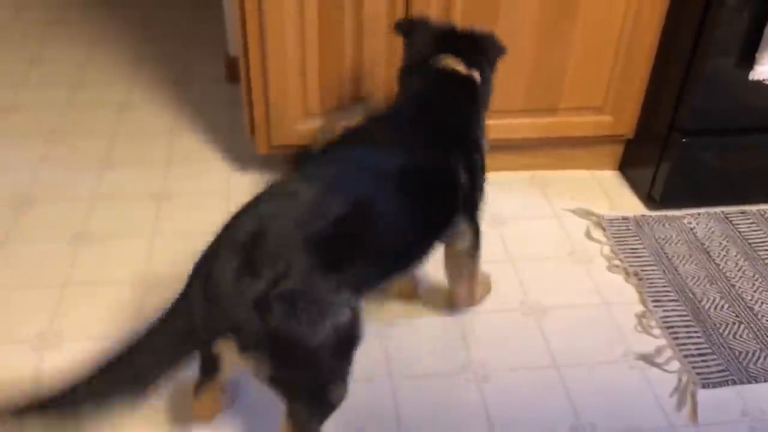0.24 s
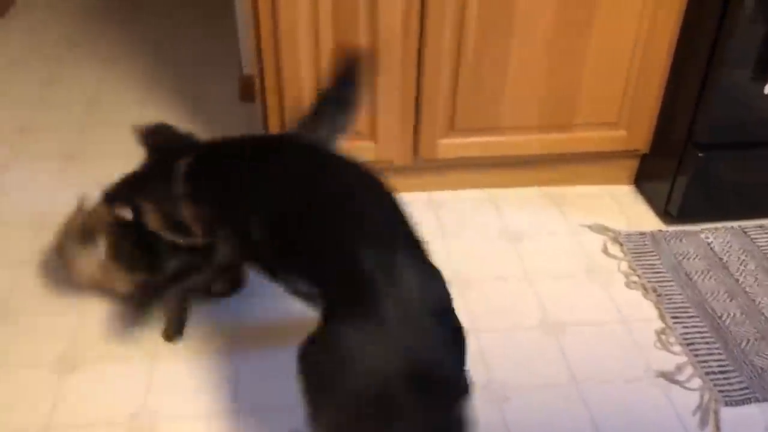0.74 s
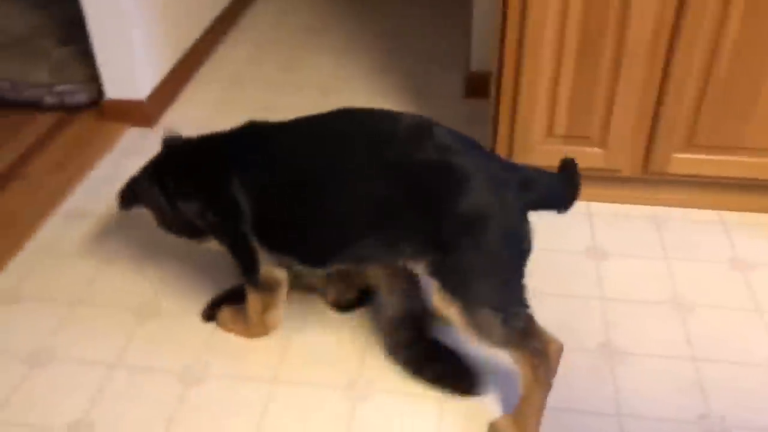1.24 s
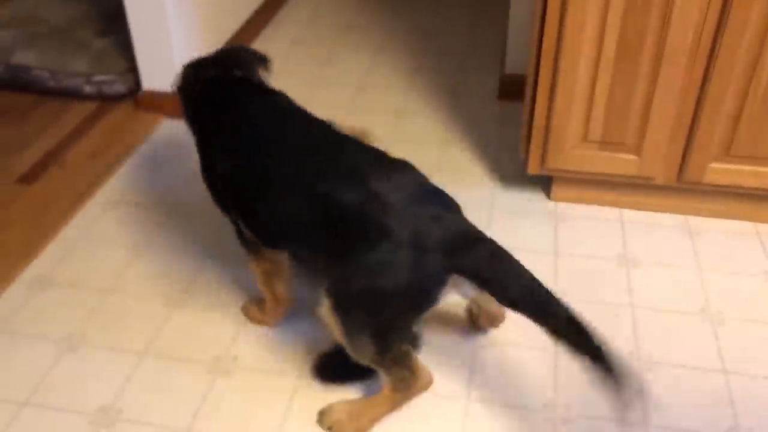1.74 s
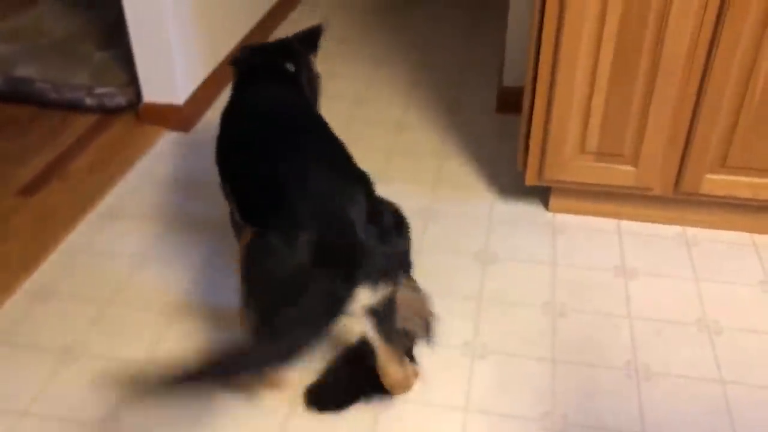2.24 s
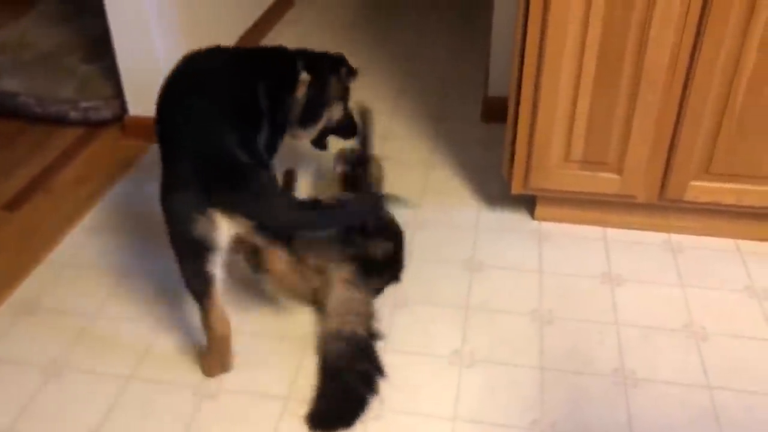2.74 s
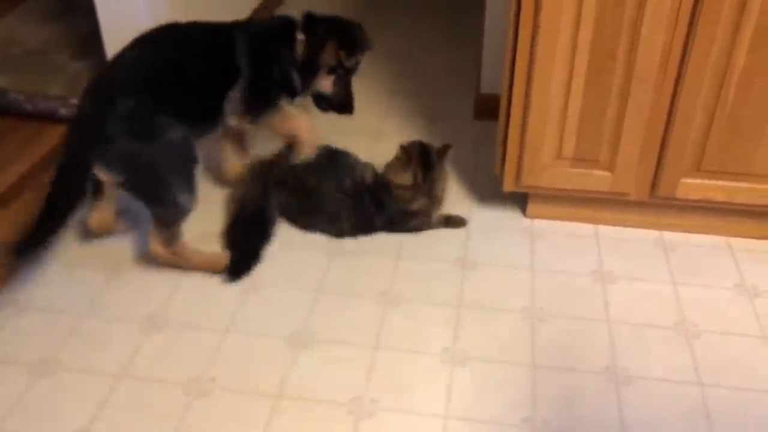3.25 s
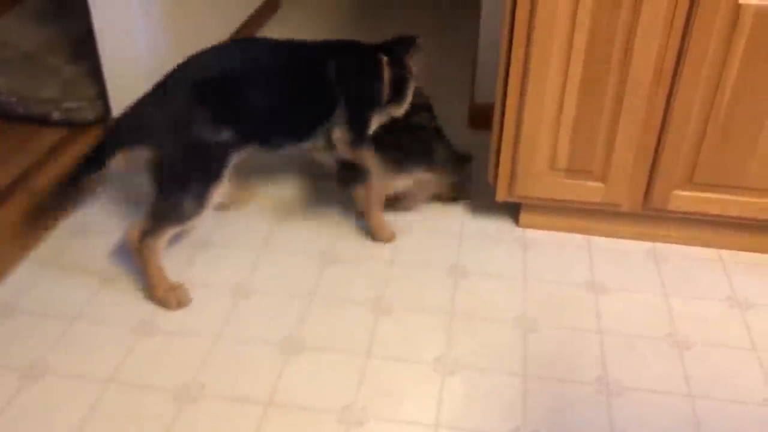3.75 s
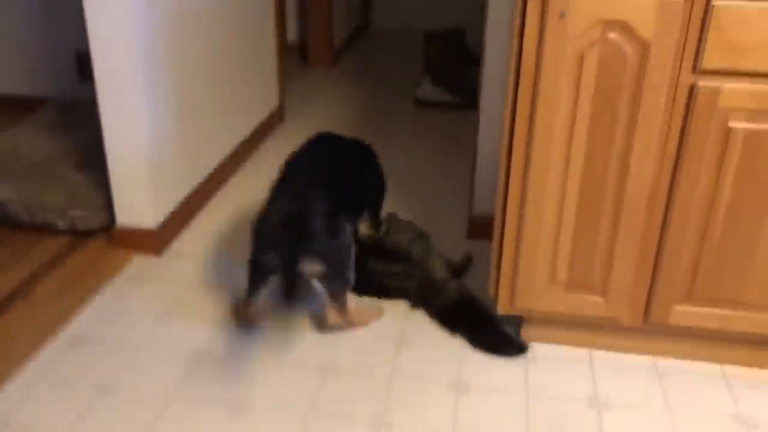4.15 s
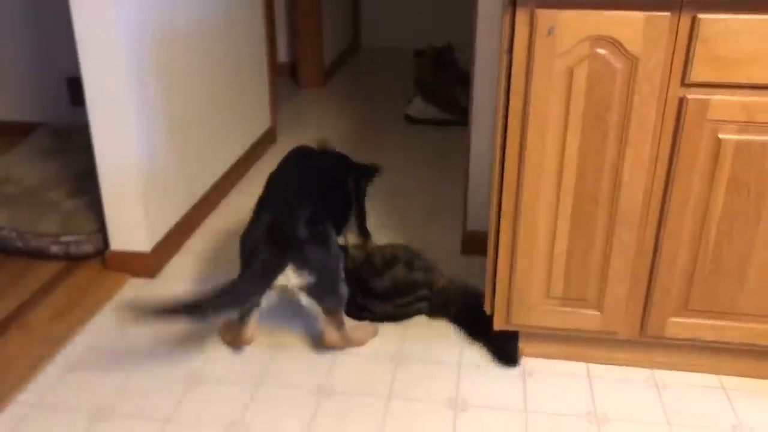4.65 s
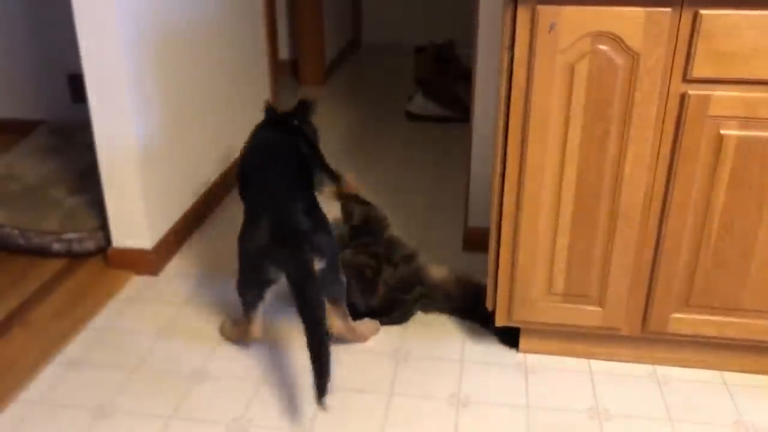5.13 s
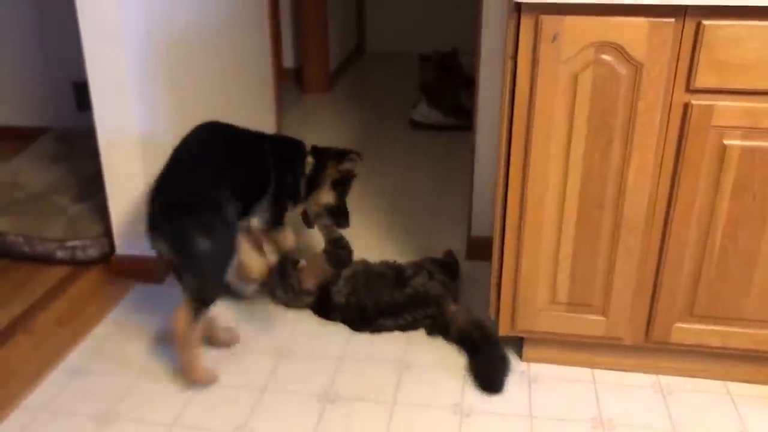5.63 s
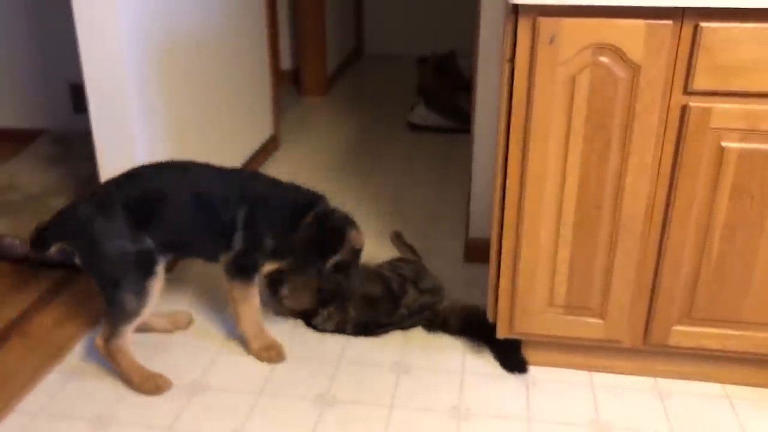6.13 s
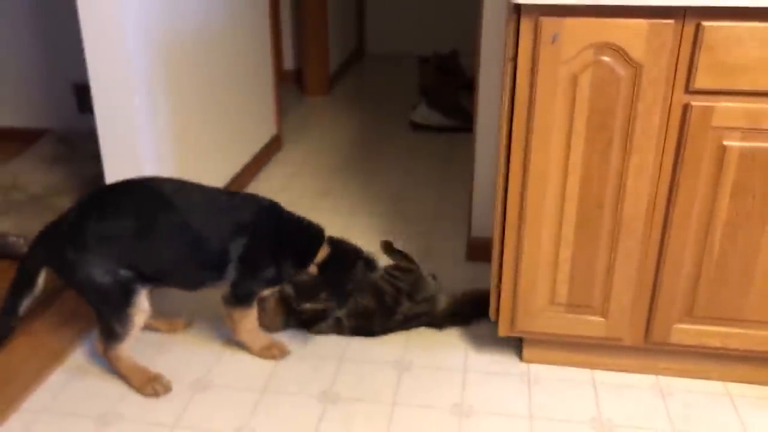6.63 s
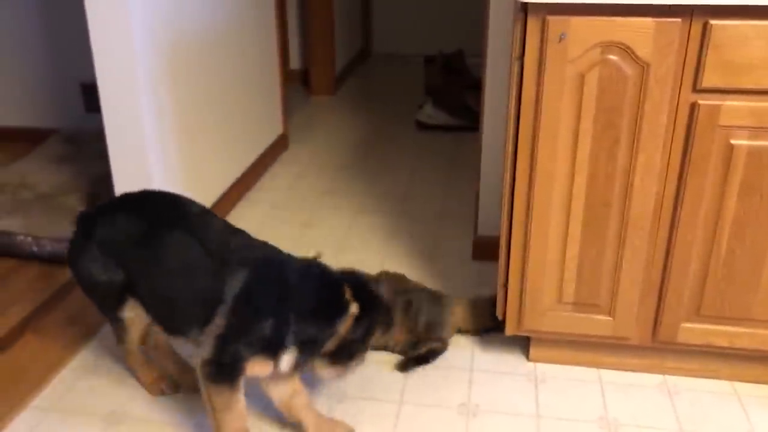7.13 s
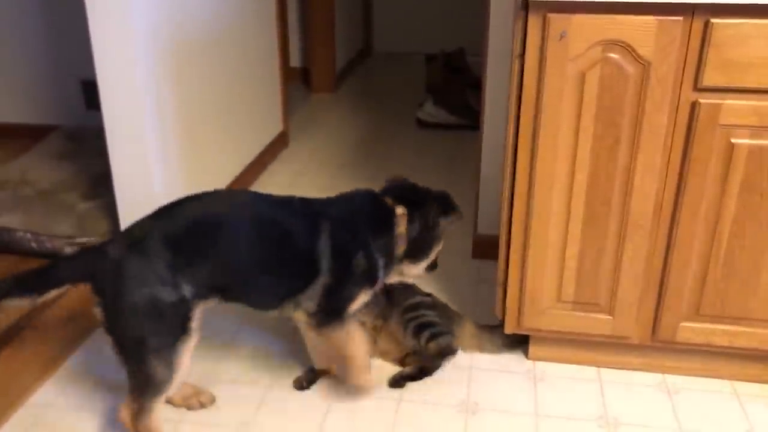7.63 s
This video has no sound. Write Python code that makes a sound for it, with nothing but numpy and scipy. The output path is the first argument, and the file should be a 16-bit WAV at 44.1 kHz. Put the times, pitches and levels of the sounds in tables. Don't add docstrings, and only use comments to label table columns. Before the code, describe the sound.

A puppy and cat tumble on a vinyl-tiled kitchen floor. Low body thuds, pad slaps and bright claw skids crowd the first second, peaking in one hard slam. It eases into soft fur rustle and a tiny sniff, then a second burst of thumps and sharp ticks. After a lull come scattered steps, nose snuffles and a last lighter scrap. A refrigerator hums faintly; a handheld phone microphone catches short, bright room reflections.

```python
import sys
import numpy as np
from scipy import signal
from scipy.fft import rfft, irfft, next_fast_len
from scipy.io import wavfile
from scipy.ndimage import map_coordinates

SR = 44100
rng = np.random.default_rng(int(sys.argv[2]) if len(sys.argv) > 2 else 0)


def volts_from_decibels(level):
    exponent = np.asarray(level, float) / 20
    return 10 ** exponent


def output_pcm(signal):
    pcm = np.clip(np.atleast_2d(signal).T, -1, 1) * 32767
    wavfile.write(sys.argv[1], SR, np.round(pcm).astype(np.int16))


N = 347508
T = np.arange(N) / SR


def unit(x):
    return x / np.sqrt(np.mean(x ** 2) + 1e-20)


def along(points, hz):
    f, v = np.transpose(points)
    return np.interp(np.log(hz + 1), np.log(f + 1), v)


def filtered(x, response):
    m = next_fast_len(len(x) + 4096)
    return irfft(rfft(x, m) * response(np.fft.rfftfreq(m, 1 / SR)), m)[:len(x)]


def peak(f, hz, width_hz):
    return 1j * f * width_hz / (hz * hz - f * f + 1j * f * width_hz)


def wobble(rate_hz):
    knots = rng.standard_normal(int(N * rate_hz / SR) + 4)
    return map_coordinates(knots, [T * rate_hz])


def add(track, start_s, sound):
    track[round(start_s * SR):][:len(sound)] += sound


def thuds():
    # (time [s], peak [dB], floor note [Hz], pad [dB])
    pounces = [(0.302, -27, 168, -13), (0.445, -36.5, 290, -15), (0.606, -29.5, 157, -7.5),
               (0.772, -27.5, 254, -13.5), (1.742, -31, 147, -14), (2.224, -38.5, 290, -10),
               (2.471, -52, 162, -5.5), (2.827, -34, 205, -10.5), (3.111, -41, 153, -15),
               (3.825, -27.5, 203, -9.5), (4.186, -39.5, 200, -7.5), (6.334, -44, 150, -17),
               (7.08, -36.5, 153, -22), (7.313, -56, 280, 6.5), (7.496, -36.5, 261, -7.5),
               (7.514, -37.5, 156, -11.5), (7.82, -36, 246, -9)]
    # (time [s], peak [dB], floor note [Hz], pad [dB])
    steps = [(0.176, -35, 217, -24), (2.05, -44.5, 191, -12), (2.92, -35.5, 198, -12),
             (3.219, -34.5, 242, -13), (3.493, -28.5, 227, -7), (3.663, -31.5, 252, -7.5),
             (3.717, -31.5, 293, -15), (3.798, -33.5, 199, -4.5), (3.868, -30.5, 142, -12),
             (4.443, -52, 169, 1), (5.716, -40, 134, -22), (6.076, -30.5, 181, -7.5)]
    # (time [s], peak [dB], floor note [Hz], pad [dB])
    blows = [
        (0.908, -24, 231, 1.5),
        (0.916, -12.5, 205, -22),
        (1.049, -24.5, 202, -8.5),
        (3.511, -24, 143, -18),
        (4.044, -40, 179, -2.5),
        (5.452, -51.5, 245, -3),
        (5.587, -28, 202, -5),
        (5.793, -39, 206, -32),
    ]
    # (joists [dB], ring [s])
    kinds = [(pounces, (-10.5, 0.05)), (steps, (-20.5, 0.065)), (blows, (-20.5, 0.035))]
    out = np.zeros(N + SR)
    t = np.arange(0, SR // 3, 10) / SR
    for landings, (joists_db, ring_s) in kinds:
        for start_s, peak_db, note_hz, pad_db in landings:
            joists = ring_modes(np.array([70.0, 80.3, 90.6, 109]), lambda f: (f / 80) ** -.3, ring_s * 0.45, t)
            span = ring_modes(np.array([49, 54]), np.ones_like, .06, t)
            joists = joists + volts_from_decibels(-3) * span
            near_note = lambda f: abs(peak(f, note_hz, 0.33 * note_hz))
            boards = ring_modes(np.geomspace(125, 310, num=8), near_note, ring_s, t)
            sheet = ring_modes(np.geomspace(320, 900, num=16), lambda f: (f / 400) ** -.7, ring_s * 1.02, t)
            thud = boards + volts_from_decibels(joists_db + 5.5) * joists + volts_from_decibels(pad_db + 4.5) * sheet
            thud = signal.resample_poly(volts_from_decibels(peak_db - 1.0) * thud, up=10, down=1)
            add(out, start_s, thud)
            add(out, start_s, volts_from_decibels(-8.5) * answered(thud, gap_s=0.031))
    return out[:N]


def ring_modes(hz, tilt, ring_s, t):
    # (frequency [Hz], width [Hz], level [dB])
    floor_notes = [(49.4, 9.4, 5), (87, 9.6, 23.5), (152, 7, 6), (205, 9.4, 9), (285, 58, -14),
                   (402, 105, 7.5), (495.5, 11, 14.5), (560, 24, 3.5), (746, 22, -29)]
    hz = hz[:, None] * np.exp(0.023 * rng.standard_normal((len(hz), 1)))
    floor = sum(volts_from_decibels(level_db) * abs(peak(hz, f, width_hz)) for f, width_hz, level_db in floor_notes)
    rise = 1 - np.exp(-(t * hz / 1.44) ** 1.56)
    fall = np.exp(-t / (ring_s * 0.61 * (200 / hz) ** 0.63))
    swing = np.sin(2 * np.pi * (hz * t + rng.random(hz.shape)))
    family = np.sum(tilt(hz) * floor * rise * fall * swing, axis=0)
    return family / abs(family).max()


def slaps():
    # (time [s], peak [dB], slap [Hz], room [dB])
    pad_slaps = [(0.177, -54, 980, -9), (0.302, -34.5, 800, -8.5), (0.443, -30, 1800, -6.5),
                 (0.609, -31.5, 751, -4.5), (0.773, -37, 830, -4), (0.908, -22, 686, -6.5),
                 (1.049, -41, 1120, -3), (1.5, -39.5, 2340, -10), (1.741, -44.5, 676, -1.5),
                 (2.826, -51, 1060, 1), (2.919, -48.5, 934, -0.5), (3.087, -36.5, 1940, -8),
                 (3.291, -44.5, 3640, -3), (3.492, -37.5, 740, -4), (3.664, -39.5, 810, -1.5),
                 (3.824, -39.5, 790, 3.5), (3.868, -32, 1220, -5.5), (4.043, -39.5, 785, -0.5),
                 (4.125, -42.5, 3740, 7.5), (4.443, -49, 810, -1.5), (5.168, -56, 904, -10),
                 (5.45, -52, 870, -10), (5.585, -48, 695, -4), (5.734, -48.5, 716, -3),
                 (6.083, -44, 795, -6), (7.029, -51, 2280, -3), (7.498, -49, 1020, -8),
                 (7.554, -45, 970, -5), (7.822, -51, 860, -2),
                 (0.445, -33.5, 560, -6.5),
        (4.128, -40.5, 920, -9.5),
    ]
    out = np.zeros(N + SR)
    t = np.arange(SR // 25) / SR
    for start_s, peak_db, slap_hz, room_db in pad_slaps:
        grit = rng.standard_normal(len(t)) * np.exp(-t / 0.0054)
        clap = lambda f: peak(f, slap_hz, .5 * slap_hz) * peak(f, slap_hz, 2 * slap_hz)
        contact(out, start_s, peak_db - .5, room_db, grit, clap)
    return out[:N]


def claws():
    # (time [s], peak [dB], tick [Hz], room [dB])
    blunt = [(0.1766, -48.5, 5000, -4.5), (0.314, -33, 5530, -11.5), (0.6042, -34, 4290, -6),
             (0.7498, -41.5, 4100, -1), (1.2054, -40, 6100, -2), (1.7468, -42.5, 5600, -3.5),
             (2.827, -44.5, 5300, -1), (3.491, -35.5, 7860, -3.5), (3.7178, -20.5, 6650, -12.5),
             (5.1667, -52.5, 7400, -1.5), (5.45, -42, 4640, -13.5)]
    # (time [s], peak [dB], tick [Hz], room [dB])
    ticks = [(0.3013, -36.5, 5870, -12), (0.4015, -41, 6290, -13), (0.6768, -31.5, 4360, -8.5),
             (0.7735, -32, 7100, -16), (0.9544, -38, 4260, -17), (1.048, -37, 5930, -20),
             (1.1076, -50.5, 5750, -5), (1.498, -55.5, 4720, 8.5), (1.6337, -53, 10700, -5),
             (3.0854, -35, 4270, -1.5), (3.2905, -32.5, 8600, -2), (3.495, -22.5, 8160, -1),
             (3.515, -47, 7300, 0), (3.6646, -41, 6220, -4), (3.8063, -48, 8300, 17),
             (4.0305, -51, 5740, -7), (4.0426, -39.5, 4060, -17), (4.1257, -23, 5150, -4),
             (5.7177, -36, 10500, -2.5), (6.0843, -36, 9050, 0), (7.0687, -29.5, 10400, -15),
             (7.4954, -39.5, 9900, 1), (7.5547, -45.5, 3970, -9), (7.8216, -46, 10200, 7)]
    # (time [s], peak [dB], tick [Hz], room [dB])
    skids = [
        (0.4433, -22.5, 4670, -9.5),
        (0.811, -15, 6300, -14),
        (0.8959, -21.5, 4000, -13),
        (0.9066, -23.5, 9700, -5),
        (1.117, -38.5, 5570, -16),
        (1.1633, -39, 5460, -7),
        (3.7984, -24, 6550, -5),
    ]
    # (pad part [dB], skid [s])
    kinds = [(blunt, (0.5, 0.0049)), (ticks, (-14.5, 0.0021)), (skids, (-36, 0.0091))]
    out = np.zeros(N + SR)
    t = np.arange(SR // 25) / SR
    for contacts, (pad_db, skid_s) in kinds:
        for start_s, peak_db, tick_hz, room_db in contacts:
            stutter = volts_from_decibels(6 * np.repeat(rng.standard_normal(len(t) // 20 + 1), 20)[:len(t)])
            decay = np.exp(-t / .0004) + .2 * stutter * np.exp(-t / skid_s)
            grit = rng.standard_normal(len(t)) * decay
            highpass = lambda f: 1j * f / (1j * f + .5 * tick_hz)
            body = lambda f: peak(f, tick_hz, 1.2 * tick_hz) * peak(f, 1.2 * tick_hz, 1.8 * tick_hz)
            pad = lambda f: volts_from_decibels(pad_db + 6.5) * peak(f, 2800, 3000)
            colour = lambda f: body(f) * highpass(f) + pad(f)
            contact(out, start_s, peak_db + 0.67, room_db + 3.5, grit, colour)
    return out[:N]


def contact(out, start_s, peak_db, room_db, grit, colour):
    tick = filtered(grit, colour)
    tick = volts_from_decibels(peak_db) * tick / abs(tick).max()
    smooth = filtered(np.arange(len(grit)) == 0, colour)
    room_gain = volts_from_decibels(room_db) * np.linalg.norm(tick) / np.linalg.norm(smooth)
    add(out, start_s, tick)
    add(out, start_s, room_gain * answered(smooth, gap_s=.005))


def swishes():
    # (time [s], length [s], centre [Hz], level [dB])
    slides = [(0.157, .03, 14000, -67), (0.296, .03, 8150, -55), (0.664, 0.033, 7000, -51),
              (1.497, 0.034, 11000, -62.5), (1.636, 0.021, 14900, -55), (1.857, 0.057, 10800, -63),
              (2.089, 0.052, 11900, -71), (2.152, .04, 13000, -64.5), (2.411, 0.14, 4940, -68.5),
              (2.908, 0.042, 11300, -59.5), (3.083, 0.028, 13000, -52), (3.825, 0.094, 7300, -52.5),
              (3.902, 0.081, 10000, -57), (4.135, 0.051, 12000, -59), (3.211, 0.05, 10100, -61),
              (3.473, 0.046, 7300, -46.5), (3.665, 0.011, 7960, -49.5), (5.713, 0.041, 9200, -62.5),
              (7.024, 0.031, 9000, -73), (7.256, 0.047, 10000, -61), (7.491, 0.026, 8800, -55),
              (7.649, 0.046, 8100, -64), (7.818, 0.017, 8400, -55.5)]
    out = np.zeros(N + SR)
    for start_s, length_s, centre_hz, level_db in slides:
        n = round(length_s * SR)
        u = np.arange(n) / n
        puff = filtered(rng.standard_normal(n), lambda f: peak(f, centre_hz, 1.2 * centre_hz) ** 2)
        add(out, start_s, volts_from_decibels(level_db) * unit(puff) * np.sin(np.pi * u) ** 1.06)
    return out[:N]


def scuffs():
    # (start [s], hold [s], hiss [dB], centre [Hz])
    fur_drags = [(0.344, 0.051, -61, 6500), (0.443, 0.25, -54, 5860), (0.81, 0.12, -53, 6500),
                 (1.003, 0.14, -59.5, 6600), (1.203, 0.035, -66, 6200), (1.368, 0.047, -57.5, 6500),
                 (1.65, 0.0066, -63, 7800), (1.8, .09, -70.5, 7500), (2.105, 0.094, -66.5, 7960),
                 (2.294, 0.33, -70, 6000), (2.77, 0.15, -77, 5500), (2.908, .26, -64, 5800),
                 (3.242, 0.066, -59.5, 7800), (3.413, .2, -57.3, 7400), (3.746, 0.16, -52.5, 6900),
                 (3.92, .13, -60, 6400), (4.156, .07, -61.5, 5300), (4.606, .08, -71, 7200),
                 (4.947, .08, -73.5, 7500), (5.362, 0.032, -66, 8500), (5.47, .14, -77, 6100),
                 (5.69, 0.56, -67.5, 7900), (6.065, 0.041, -58.5, 7500), (6.222, 0.096, -64, 7900),
                 (6.58, .06, -74.5, 6700), (6.793, 0.14, -68.5, 6950), (7.029, 0.062, -54.5, 7900),
                 (7.137, 0.15, -63, 7800), (7.38, 0.23, -70.5, 7550), (7.665, 0.17, -69, 7400)]
    # (start [s], hold [s], rumble [dB])
    weight_shifts = [(.14, 0.08, -55), (.34, 0.025, -43.5), (.54, 0.15, -44.5), (.83, 0.097, -40),
                     (1.24, 0.15, -53.5), (1.41, 0.018, -47), (1.5, 0.41, -55.5), (1.95, 0.12, -60),
                     (2.28, 0.32, -59.5), (2.85, 0.035, -44.5), (2.98, .02, -56.5), (3.23, 0.1, -52),
                     (3.52, 0.023, -35.5), (3.76, 0.085, -39), (3.9, 0.092, -45.5), (4.06, 0.19, -52),
                     (4.45, .06, -59.5), (5.6, .16, -55), (6.03, .08, -57), (6.25, 0.11, -60.5),
                     (6.6, 0.19, -60), (7.03, 0.12, -49.5), (7.57, 0.024, -49), (7.74, .02, -58.5),
                     (7.86, .02, -53.5)]
    # (frequency [Hz], density [dB per Hz])
    rumble_spectrum = [(21, -47), (35, -3), (97, 2), (135, -5), (207, -1.5), (348, -6.5), (499, -17.5),
                       (652, -17), (1500, -43), (1950, -85), (3300, -120)]
    stroke_t = T[::88]
    drags = strokes(fur_drags, swell_db_per_s=229, fade_db_per_s=131)
    drag_power = drags.sum(axis=0)
    centre_hz = np.transpose(fur_drags)[3] @ drags / drag_power
    grains = rng.standard_normal(N) * volts_from_decibels(2.5 * wobble(500) + wobble(30))
    hz, t, z = signal.stft(grains, SR, nperseg=256)
    octaves = np.log2((hz[:, None] + 1) / np.interp(t, stroke_t, centre_hz))
    shape = volts_from_decibels(-6 * octaves ** 2) + volts_from_decibels(-7) * abs(peak(hz[:, None], 3000, 6000))
    shape = shape / np.sqrt(np.mean(shape ** 2, axis=0))
    hiss = signal.istft(z * shape, SR, nperseg=256)[1][:N]
    hiss = volts_from_decibels(-2.24) * np.sqrt(np.interp(T, stroke_t, drag_power)) * unit(hiss)

    rumble = filtered(rng.standard_normal(N), lambda f: volts_from_decibels(along(rumble_spectrum, f)))
    shifts = strokes(weight_shifts, swell_db_per_s=249, fade_db_per_s=218)
    load = np.interp(T, stroke_t, shifts.sum(axis=0))
    weight = np.sqrt(np.maximum(load - volts_from_decibels(2 * -63), 0))
    return hiss + weight * volts_from_decibels(-3 + 0.67 * wobble(15)) * unit(rumble)


def strokes(rows, swell_db_per_s, fade_db_per_s):
    start_s, hold_s, level_db = np.transpose(rows)[:3, :, None]
    t = T[::88]
    early_s = np.maximum(start_s - t, 0)
    late_s = np.maximum(t - start_s - hold_s, 0)
    return volts_from_decibels(2 * (level_db - swell_db_per_s * early_s - fade_db_per_s * late_s))


def snuffles():
    # (time [s], length [s], nose [Hz], nose width [Hz], level [dB], upper band [dB])
    nose_puffs = [
        (2.67, .06, 4200, 1700, -72, -13),
        (6.641, 0.099, 2850, 1200, -71, -15),
        (6.3, 0.12, 2500, 510, -71.5, -2),
        (7.098, 0.14, 2340, 290, -59, -5),
        (7.08, 0.13, 1040, 1100, -64.5, -14),
    ]
    out = np.zeros(N + SR)
    for start_s, length_s, nose_hz, width_hz, level_db, upper_db in nose_puffs:
        n = round(length_s * SR)
        u = np.arange(n) / n
        nose = lambda f: peak(f, nose_hz, width_hz) ** 2 + volts_from_decibels(upper_db) * peak(f, 5460, 1200) ** 2
        puff = filtered(rng.standard_normal(n), nose)
        puff = volts_from_decibels(level_db) * unit(puff) * np.sin(np.pi * u ** 0.45)
        add(out, start_s, puff)
        add(out, start_s, volts_from_decibels(-7) * answered(puff, gap_s=.01))
    return out[:N]


def refrigerator():
    line_hz = [51.55, 58.6, 120, 162.7, 193.2, 234.4, 240, 293.1, 309.4]
    line_db = [-68, -65, -66.5, -76.5, -78.5, -77.5, -99, -87, -77]
    # (frequency [Hz], density [dB per Hz])
    air_spectrum = [(30, -19), (60, -10.5), (110, 5.5), (160, -1.5), (300, -1), (500, -8), (1000, -12),
                    (2000, -21), (4000, -27), (8000, -29.5), (14800, -33.5), (16500, -54)]
    aligned_s = 5.2
    hum = np.zeros(N)
    for hz, db in zip(line_hz, line_db):
        hum += volts_from_decibels(db + 4.5 + 1.5 * wobble(4)) * np.cos(2 * np.pi * hz * (T - aligned_s))
    air = filtered(rng.standard_normal(N), lambda f: volts_from_decibels(along(air_spectrum, f)))
    return hum + volts_from_decibels(-63.5 + 0.44 * wobble(2.66)) * unit(air)


def answered(x, gap_s):
    # (frequency [Hz], t60 [s])
    kitchen_t60 = [(60, 0.78), (250, 0.42), (1000, 0.88), (3000, 0.58), (6000, 0.56), (10000, 0.22),
                   (16000, 0.076)]
    # (frequency [Hz], level [dB])
    answer_colour = [(100, 1.5), (1000, 2.5), (3000, 7), (6000, 5.5), (10000, -1.5), (16000, -28)]
    hz, t, z = signal.stft(rng.standard_normal(SR * 2 // 5), SR, nperseg=256)
    decay_db = -60 * t / along(kitchen_t60, hz)[:, None]
    colour_db = along(answer_colour, hz)[:, None]
    tail = signal.istft(z * volts_from_decibels(decay_db + colour_db), SR, nperseg=256)[1]
    age_s = np.arange(len(tail)) / SR
    walls = np.repeat(rng.standard_normal(len(tail) // 64 + 1), 64)[:len(tail)]
    echoes = volts_from_decibels(5 * walls * np.exp(-age_s / .06))
    tail = tail * (1 - np.exp(-age_s / gap_s)) * echoes
    return signal.fftconvolve(x, tail / np.linalg.norm(tail))


def scene():
    animals = thuds() + slaps() + claws() + swishes() + scuffs() + snuffles()
    return (animals + refrigerator())[None]


def low_pass(x):
    return signal.sosfilt(signal.butter(12, 17030, fs=SR, output="sos"), x)


def record(dry):
    # (frequency [Hz], gain [dB])
    top_edge = [(12000, 0), (15700, 0), (16000, -11), (16700, -13), (17000, -40)]
    bass_cut = lambda f: (1j * f / (1j * f + 30)) ** 6
    cut = filtered(dry[0], lambda f: bass_cut(f) * volts_from_decibels(along(top_edge, f)))
    return low_pass(cut[None])


dry = scene()
out = record(dry)
output_pcm(out)
```